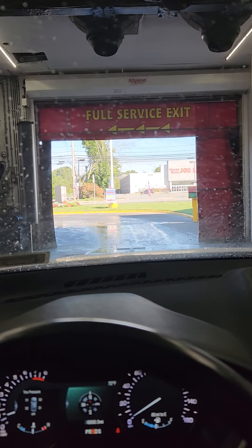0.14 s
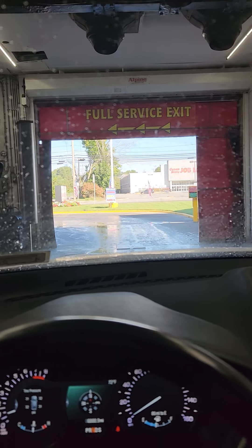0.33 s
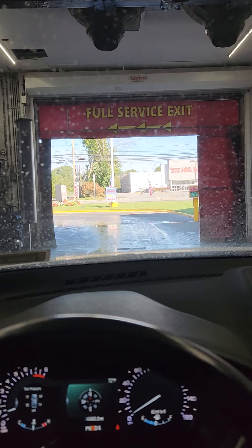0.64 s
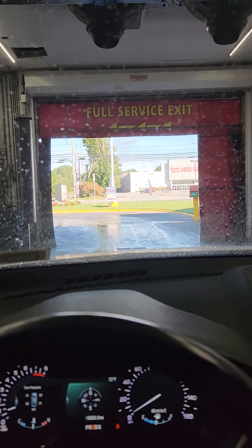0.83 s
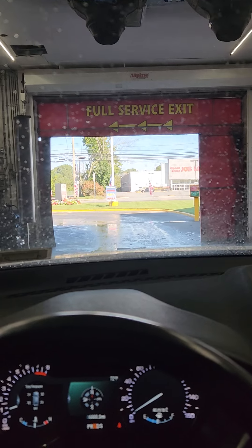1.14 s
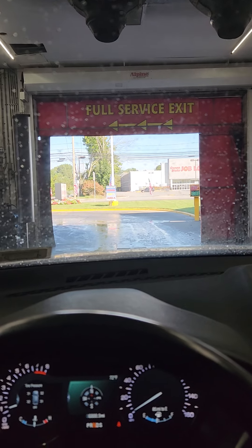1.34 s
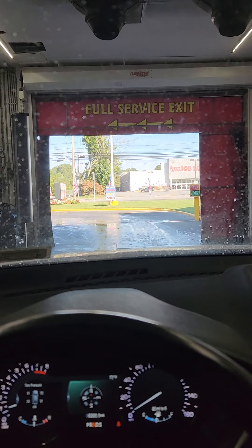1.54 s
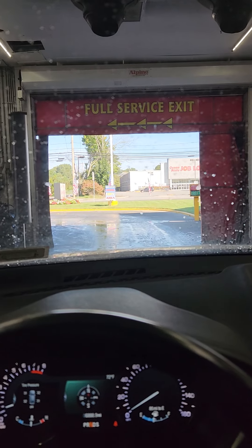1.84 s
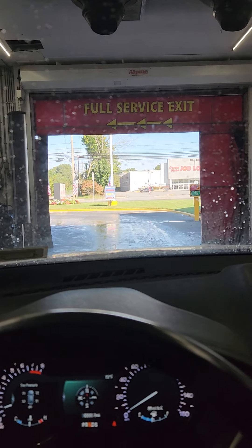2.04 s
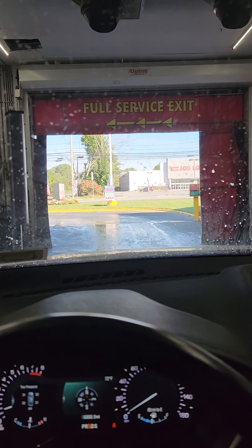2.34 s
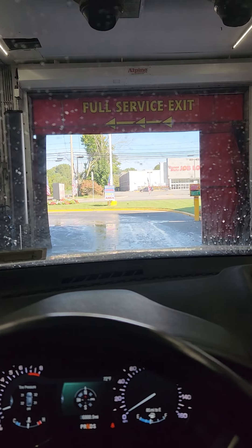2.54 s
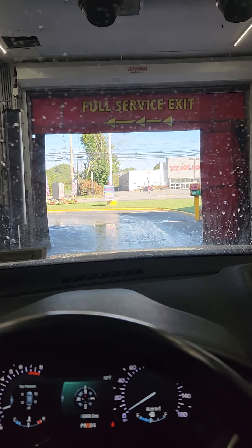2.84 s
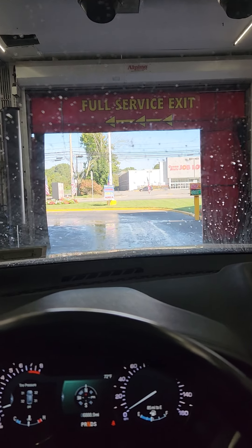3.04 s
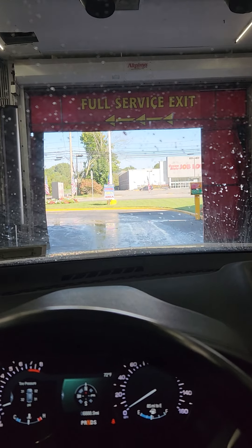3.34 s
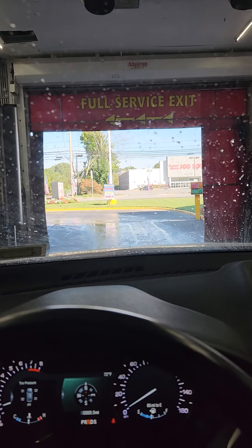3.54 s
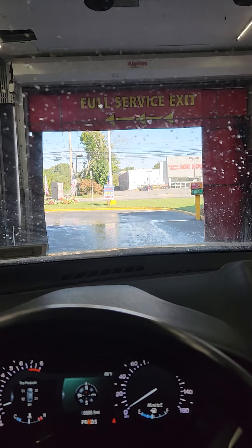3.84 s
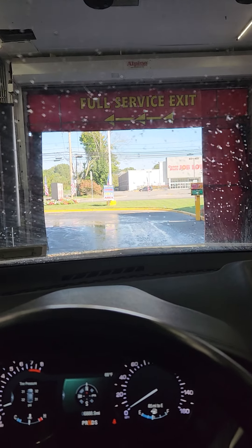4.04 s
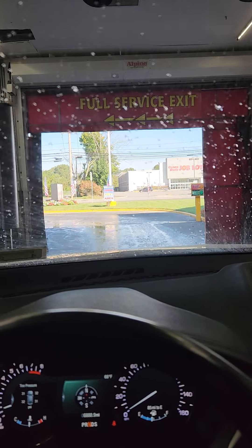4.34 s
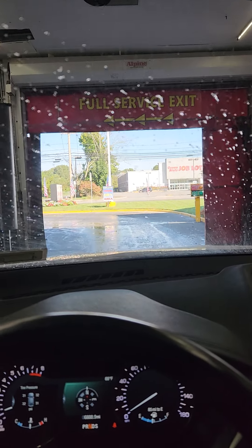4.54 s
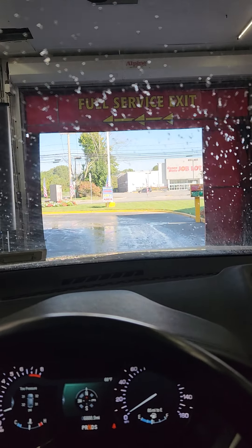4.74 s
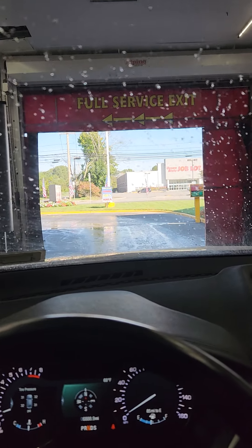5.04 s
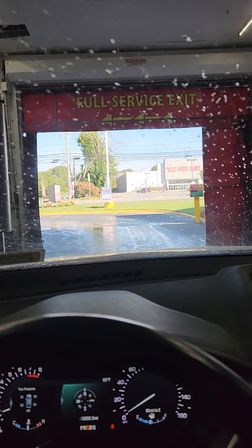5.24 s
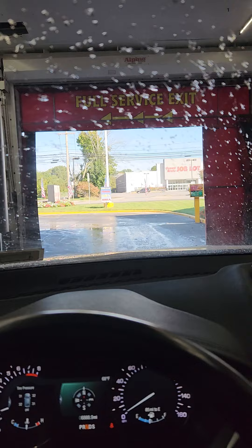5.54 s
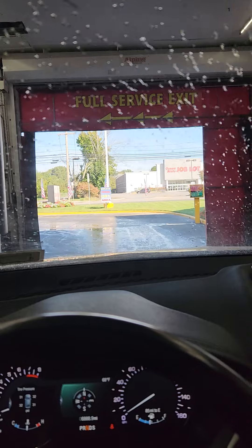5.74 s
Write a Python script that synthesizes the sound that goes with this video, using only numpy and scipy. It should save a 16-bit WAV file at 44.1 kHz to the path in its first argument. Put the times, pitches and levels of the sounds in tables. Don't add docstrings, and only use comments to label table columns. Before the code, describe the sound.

Inside a car, muffled blower wind rumbles and buffets the roof and doors; a fluttering hiss at the window seals drops off.

```python
import sys
import numpy as np
from scipy import signal
from scipy.fft import rfft
from scipy.io import wavfile
from scipy.ndimage import uniform_filter1d

SR = 44100
rng = np.random.default_rng(int(sys.argv[2]) if len(sys.argv) > 2 else 0)


def log_audio(samples):
    frames = np.atleast_2d(samples).T
    limited = np.clip(frames, -1, 1)
    pcm = np.round(limited * 32767).astype(np.int16)
    wavfile.write(sys.argv[1], SR, pcm)


def magnitude_from_level(level_db):
    exponent = np.asarray(level_db, float) / 20
    return 10 ** exponent


N = 259308
TIME = np.arange(N) / SR

# (frequency [Hz], likeness [0-1], left lead [rad], left minus right [dB])
PORTS = [(43, .998, -.12, .4), (150, .998, 0, 1), (200, .985, 0, .7), (270, .89, .37, 1.5),
         (315, .85, .35, 4.8), (430, .9, .2, 3.9), (520, .65, .15, 2), (1070, .5, .6, .8),
         (1300, .27, .4, -1.5), (1690, .37, 2.2, -5.5), (2200, .1, .5, -.4), (4900, .16, 1.8, -2.4),
         (7500, .04, 2, -.2), (14000, .07, 3.1, 3)]
# (frequency [Hz], level [dB per Hz])
PLAIN_AIR = [(10, 0), (20000, 0)]
# (time [s], share [0-1])
PAST_JETS = [
    (0, 0.43),
    (2.5, 0.22),
    (3.9, 0.91),
    (5.88, 1),
]
# (time [s], level [dB])
JET_FORCE = [(0, -20), (.5, -14.5), (.9, -18), (1.25, -21), (1.45, -18.5), (1.95, -21), (2.2, -20),
             (2.7, -22), (3.45, -23), (3.9, -29), (4.3, -26), (5.1, -23), (5.88, -24.5)]
# (frequency [Hz], level [dB per Hz])
GLASS = [(300, -41), (480, -23), (560, -23.5), (690, -23.5), (800, -29.5), (1150, -33.5), (1690, -36),
         (1830, -43), (2600, -48), (3100, -47), (5100, -51.5), (6200, -59), (7700, -62), (11000, -79)]
# (frequency [Hz], level [dB per Hz])
RUMBLE = [(15, -28.5), (30, -0.5), (57, 5.5), (75, 4), (100, 1.5), (170, -1), (195, -5), (280, -13.5),
          (450, -7), (900, -81.5), (2000, -130)]
# (frequency [Hz], width [Hz], level
# under the jets [dB], level past them [dB])
PANELS = [(99.5, 12, -17, 7.5), (189, 36, 1.5, -21.5), (237.3, 63, 5.5, -5), (288.7, 59, 1, -8.5),
          (344.8, 61.5, 0, 5.5), (392.6, 51, -1.5, -2.5), (465, 31, -8.5, 2.5), (563, 91, -5, -25.5)]
# (time [s], low mode [Hz], high mode [Hz])
ROOF_HZ = [(0, 125, 147), (.4, 110, 149.7), (.7, 113, 154.4), (1.1, 113, 143.3), (1.4, 133.5, 143),
           (1.9, 130.7, 150.5), (2.5, 133.6, 158.4), (2.9, 116.5, 155.4), (3.6, 116.2, 152.7),
           (4.0, 129, 148), (4.5, 127.5, 139.3), (4.75, 101.6, 146.8), (5.1, 122, 148.7), (5.88, 130, 131)]
# (time [s], peak [dB], length [s])
ROOF_LOW = [(0.27, -21, 0.031), (0.45, -18.5, 0.094), (0.81, -19, 0.04), (0.97, -17, 0.16),
            (1.45, -15.5, 0.078), (1.65, -16.5, 0.088), (1.78, -22, 0.06), (1.91, -22, 0.078),
            (2.11, -17.5, 0.062), (2.44, -23.5, 0.06), (2.7, -24, 0.065), (2.89, -18.5, 0.069),
            (3.34, -29.5, 0.055), (3.5, -22, 0.11), (3.71, -31, 0.05), (3.82, -23.5, 0.068),
            (4.06, -22, 0.044), (4.22, -21, 0.023), (4.48, -17, 0.071), (4.71, -20, 0.05),
            (4.97, -30, 0.066), (5.21, -18, 0.089), (5.51, -22, 0.06), (5.82, -30, 0.028)]
# (time [s], peak [dB], length [s])
ROOF_HIGH = [(0.4, -17, 0.1), (0.6, -21, 0.14), (0.79, -19, 0.11), (1.07, -19, 0.09), (1.27, -13.5, 0.11),
             (1.48, -29, 0.05), (1.64, -21, 0.16), (1.9, -17.5, 0.078), (2.09, -21.5, 0.074),
             (2.29, -12.5, 0.026), (2.41, -17, 0.05), (2.68, -21, 0.036), (2.78, -16.5, 0.082),
             (3.12, -21, 0.034), (3.6, -14.5, 0.036), (3.88, -25, 0.09), (4.06, -37, 0.05),
             (4.24, -30, 0.094), (4.4, -16, 0.045), (4.68, -21, 0.14), (4.95, -24, 0.05), (5.3, -22, 0.064),
             (5.52, -27, 0.081), (5.77, -32, 0.22)]
# (time [s], peak [dB], length [s])
BOOM_PUMPS = [(0.05, -15, 0.066), (0.18, -15.5, 0.04), (0.29, -22, 0.089), (0.58, -14.5, 0.078),
              (0.82, -22, 0.06), (1.04, -24.5, 0.13), (1.22, -24, 0.086), (1.38, -22, 0.059),
              (1.53, -30, 0.05), (2.04, -22, 0.06), (2.4, -34, 0.05), (2.58, -19, 0.09), (2.91, -28, 0.091),
              (3.2, -16, 0.051), (3.3, -15.5, 0.035), (3.54, -22, 0.06), (3.74, -33.5, 0.052),
              (3.97, -19, 0.05), (4.08, -19, 0.06), (4.29, -24, 0.07), (4.67, -16, 0.06),
              (4.94, -16, 0.065), (5.1, -13.5, 0.052), (5.19, -15.5, 0.086), (5.35, -14, 0.11),
              (5.75, -16, 0.37)]
# (time [s], pitch [Hz])
BOOM_HZ = [(0, 45.8), (.7, 43.3), (1.1, 38), (2.0, 40.8), (3.4, 37.6), (3.9, 41), (4.6, 44.4), (4.95, 44.2),
           (5.05, 33.3), (5.5, 31.2), (5.88, 35)]
# (time [s], level [dB])
HISS_LEVEL = [(0, -55.5), (.3, -56), (.7, -58.3), (2.0, -58.3), (2.45, -59.2), (3.0, -59.3), (3.7, -60.3),
              (4.0, -66), (4.35, -75), (4.7, -80), (5.88, -84)]
# (frequency [Hz], level [dB per Hz])
SEALS = [(1200, -25), (2000, -5), (2800, -5.5), (3450, 0), (3900, -3), (5000, -2), (5600, -3), (5900, -8),
         (6900, -11), (7500, -9), (8300, -14), (10700, -19.5), (11700, -17), (15500, -19)]
# (time [s], rise [dB], length [s])
GUSTS = [(0.086, 0.69, 0.024), (0.152, 0.98, 0.011), (0.257, 1.9, 0.0076), (0.295, 1.5, 0.014),
         (0.497, 1, 0.033), (0.754, 0.95, 0.032), (0.904, 0.87, 0.022), (1.064, 1.4, 0.063),
         (1.185, 1.5, 0.013), (1.345, 0.7, 0.027), (1.636, 1.4, 0.019), (1.788, 1.2, 0.036),
         (2.057, 1.3, 0.028), (2.263, 1.9, 0.036), (2.327, 2, 0.024), (2.415, 1.3, 0.028),
         (2.744, 2.3, 0.024), (3.069, 2, 0.022), (3.109, 3.2, 0.019), (3.233, 1.8, 0.022),
         (3.295, 1.3, 0.029), (3.453, 2.9, 0.022), (3.588, 3.1, 0.024), (3.724, 1.1, 0.024),
         (4.009, 1.1, 0.03), (4.196, 1.4, 0.019), (4.238, 1.7, 0.034)]


def evened(x):
    return x / np.sqrt(np.mean(x ** 2) + 1e-20)


def read(points, hz, column=1):
    points = np.array(points)
    return np.interp(np.log(hz + 1), np.log(points[:, 0] + 1), points[:, column])


def curve(rows, column=1):
    rows = np.array(rows)
    return np.interp(TIME, rows[:, 0], rows[:, column])


def past_jets():
    return np.clip(curve(PAST_JETS), 0, 1)


def bursts(rows, rest_db):
    power = magnitude_from_level(2 * rest_db)
    for start, peak_db, length in rows:
        power = power + magnitude_from_level(2 * peak_db) * np.exp(-((TIME - start) / (0.57 * length)) ** 2)
    return 10 * np.log10(power)


def band_rms(x, lo_hz, hi_hz):
    hz = np.fft.rfftfreq(N, 1 / SR)
    spectrum = rfft(x.mean(0))
    inside = (hz > lo_hz) & (hz < hi_hz)
    return np.sqrt(2 * np.sum(abs(spectrum[inside]) ** 2)) / N


def air(colour, patchy_db, size=1024):
    frames = 4 * N // size + 5
    hz = np.fft.rfftfreq(size, 1 / SR)
    a, b, c, d, patches = rng.standard_normal((frames, len(hz), 5)).T
    patches = uniform_filter1d(patches, size=12, axis=0)
    patches = evened(uniform_filter1d(patches, size=12, axis=1))
    same = read(PORTS, hz)[:, None]
    left = a + 1j * b
    right = same * left + np.sqrt(1 - same ** 2) * (c + 1j * d)
    lean = magnitude_from_level(read(PORTS, hz, column=3) / 2) * np.exp(0.5j * read(PORTS, hz, column=2))
    lean = lean[:, None]
    strength = magnitude_from_level(read(colour, hz)[:, None] + patchy_db * patches)
    spectrum = np.array([left * lean, right / lean]) * strength
    wind = signal.istft(spectrum, nperseg=size, noverlap=3 * size // 4)[1]
    return wind[:, size // 2:N + size // 2]


def resonate(x, hz, width):
    turn = np.exp(2j * np.pi * np.cumsum(hz * np.ones(N)) / SR)
    r = np.exp(-np.pi * width / SR)
    slow = x / turn
    for _ in range(2):
        slow = signal.lfilter([1 - r], [1, -r], slow)
    return 2 * (turn * slow).real


def pressed(x, level_db, size):
    x = evened(x)
    power = x.mean(0) ** 2
    for _ in range(2):
        power = uniform_filter1d(power, size=size)
    return magnitude_from_level(level_db) * evened(x / np.sqrt(power + 0.03))


def rumble():
    return pressed(air(RUMBLE, patchy_db=2.5, size=4096), -20.5, size=3000)


def roar():
    wind = air(GLASS, patchy_db=0.23)
    start_db, settle_s = 4.5, 0.17
    level_db = -33.5 + start_db * np.exp(-TIME / settle_s)
    level_db = level_db + 0.056 * (curve(JET_FORCE) + 22)
    return magnitude_from_level(level_db) * wind / band_rms(wind, 600, 1800)


def panels():
    past, push = past_jets(), air(PLAIN_AIR, 0, size=4096)
    ringing, sign = 0, 1
    for hz, width, under_db, after_db in PANELS:
        level_db = under_db + (after_db - under_db) * past
        ringing = ringing + sign * magnitude_from_level(level_db) * evened(resonate(push, hz, width))
        sign = -sign
    return pressed(ringing, curve(JET_FORCE) - 1.2, size=2500)


def roof():
    past, push = past_jets(), air(PLAIN_AIR, 0, size=4096)
    low = resonate(push, curve(ROOF_HZ), 22.5)
    low_db = bursts(ROOF_LOW, -24 - 1.5 * past) - 0.3
    high = resonate(push, curve(ROOF_HZ, column=2), 16.7)
    high_db = bursts(ROOF_HIGH, -22.5 - 6 * past) - 0.3
    return pressed(low, low_db, size=1500) + pressed(high, high_db, size=1200)


def boom():
    spring = resonate(air(PLAIN_AIR, 0, size=4096), curve(BOOM_HZ), 26)
    return pressed(spring, bursts(BOOM_PUMPS, -24.5) - 0.1, size=1500)


def hiss():
    flutter = rng.standard_normal(N)
    for _ in range(2):
        flutter = uniform_filter1d(flutter, size=700)
    flutter = evened(flutter - uniform_filter1d(flutter, size=5000))
    gusts_db = 0
    for start, rise_db, length in GUSTS:
        gusts_db = gusts_db + rise_db * np.exp(-0.5 * ((TIME - start) / (0.45 * length)) ** 2)
    level_db = curve(HISS_LEVEL) + 1.7 * gusts_db + 0.9 * flutter - 1.03
    wind = air(SEALS, patchy_db=0.5)
    return magnitude_from_level(level_db) * wind / band_rms(wind, 8500, 15500)


def scene():
    return rumble() + roar() + panels() + roof() + boom() + hiss()


def top_cut(x):
    return signal.sosfilt(signal.butter(12, 15930, fs=SR, output="sos"), x)


def record(dry):
    limited = 2 * np.tanh(dry / 2)
    edge_hz = 15780
    treble_cut = signal.firwin(1023, edge_hz, window=("kaiser", 9), fs=SR)
    mix = signal.oaconvolve(limited, treble_cut[None], "same")
    return top_cut(mix)


dry = scene()
out = record(dry)
log_audio(out)
```